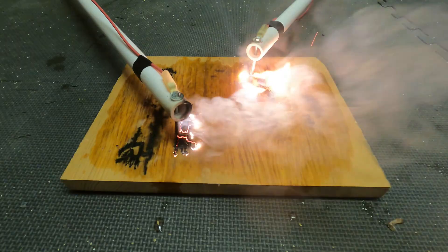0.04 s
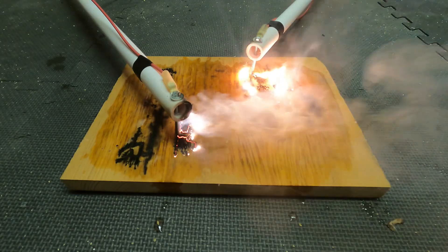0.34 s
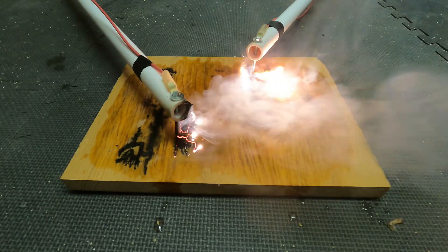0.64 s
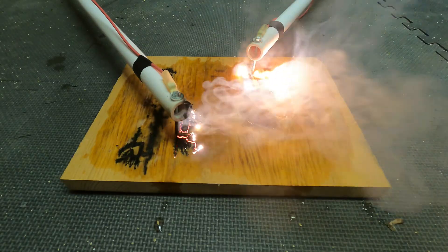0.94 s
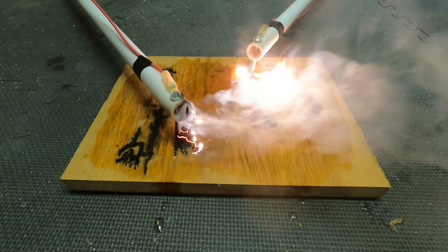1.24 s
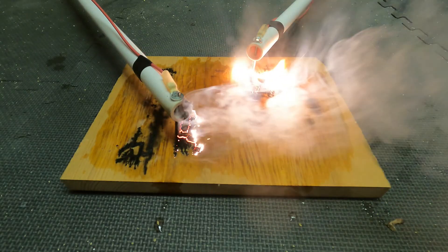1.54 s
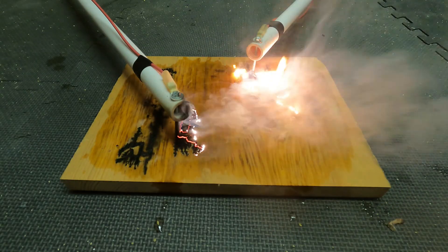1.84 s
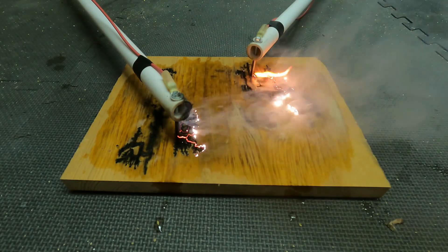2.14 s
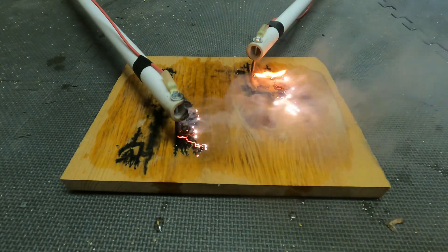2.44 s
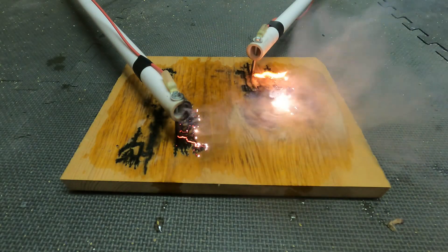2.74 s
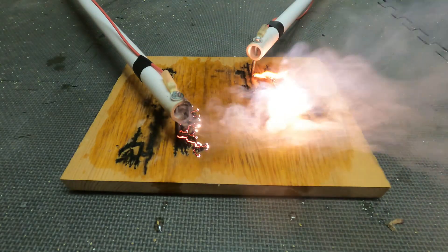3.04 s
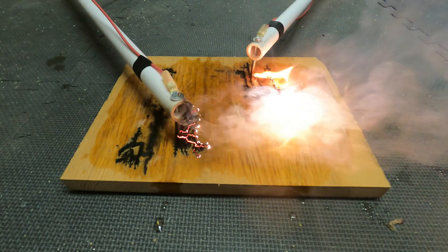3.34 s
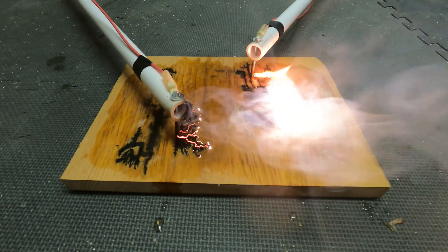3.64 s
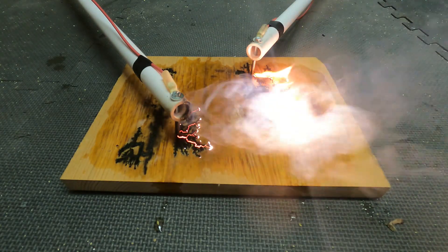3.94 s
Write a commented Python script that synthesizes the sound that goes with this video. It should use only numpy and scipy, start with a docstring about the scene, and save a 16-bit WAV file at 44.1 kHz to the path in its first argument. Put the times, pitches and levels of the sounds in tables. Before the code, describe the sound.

An electric arc crackles and sizzles through wet wood over a low hum.

```python
"""Arc burning through wet wood

Close by in a workshop, just right of the stereo microphones, high voltage from a mains transformer
burns a track through a wet board. The arc strikes every half cycle as a short volley of tiny sparks,
much stronger in one polarity, and ticks as it goes out. It flares and the wood pops; for most of the
third second it sinks to a soft sizzle. The transformer hums throughout."""
import sys
import numpy as np
from scipy import signal
from scipy.fft import rfft, irfft
from scipy.io import wavfile

SR = 44100
rng = np.random.default_rng(int(sys.argv[2]) if len(sys.argv) > 2 else 0)


def generate_wav(sig):
    """Save sig (samples, or channels by samples) to the path in sys.argv[1] as 16-bit PCM at SR."""
    pcm = np.round(np.clip(np.atleast_2d(sig).T, -1, 1) * 32767).astype(np.int16)
    wavfile.write(sys.argv[1], SR, pcm)


N = 176400
TIME = np.arange(N) / SR
MAINS_HZ = 59.984
# moments in the mains cycle: strong volley, weak volley, arc going out, trough of the hum
STRONG_AT_S, WEAK_AT_S, OUT_AT_S, TROUGH_AT_S = .0146, .0057, .0092, .0017
MAINS_PHASE = 2 * np.pi * MAINS_HZ * (TIME - TROUGH_AT_S)
STRONG_DB, WEAK_DB, SIZZLE_DB, FLARE_DB = -1, -.3, -18, -1.26
POP_DB, TICK_DB, FLOOR_DB = 2.5, -18.5, -42
CLICK_GAIN = np.sqrt(.004 * SR)  # gives one sample the energy of 4 ms at the same level


# Volleys of the strong and of the weak polarity: (time [s], relative level [dB])
STRONG_VOLLEYS = [(0, -27.5), (.09, -32), (.15, -37), (.21, -27), (.53, -26), (.565, -30), (.7, -32),
                  (.8, -29.5), (.885, -26), (.92, -36), (1.13, -33), (1.19, -24), (1.232, -25.5),
                  (1.248, -37), (1.3, -43), (1.33, -25), (1.42, -29.5), (1.45, -33.5), (1.5, -29.5),
                  (1.516, -23), (1.58, -24), (1.67, -26), (1.7, -37), (1.785, -33.5), (1.83, -28),
                  (1.865, -32), (1.94, -27.5), (1.99, -32), (2.06, -41), (2.6, -40.5), (2.82, -43.5),
                  (2.848, -32), (2.9, -32.5), (2.915, -43), (2.94, -27.5), (3.06, -26.5), (3.1, -24.5),
                  (3.15, -26.5), (3.27, -25), (3.31, -32.5), (3.35, -23.5), (3.565, -22), (3.6, -28),
                  (3.65, -33), (3.68, -28.5), (3.98, -27)]
WEAK_VOLLEYS = [(0.01, -32.5), (0.3, -32), (0.85, -32.5), (1.1, -33.5), (1.18, -31.5), (1.65, -31.5),
                (1.95, -34), (2.08, -41.5), (2.18, -39), (2.32, -38), (2.45, -42), (2.82, -43.5),
                (2.84, -37), (2.9, -44), (2.92, -36), (2.94, -36), (3.18, -37.5), (3.35, -40), (3.98, -43)]
# The arc's midrange spit and top fizz: (time [s], boost [dB])
SPIT_BOOST = [(0, 3), (.5, -0.5), (1.05, -1.5), (1.2, 0.5), (1.45, 3), (1.9, 2), (2.15, -4.5), (2.8, -3),
              (3.2, -2.5), (3.5, -2), (4, 1)]
FIZZ_BOOST = [(0, 7), (.25, 7), (.6, 1), (1.1, 3.5), (1.15, 2.5), (1.35, -2), (1.58, 4), (1.65, -5),
              (1.8, 1), (1.95, -1.5), (2.8, 1), (3.02, 0), (3.3, 0), (3.47, -3.5), (3.8, 4.5), (4, -.5)]
# Tone of the sparks at the microphones: (frequency [Hz], relative level [dB])
SPARK_SPECTRUM = [(60, -35), (200, 0.5), (400, -1), (600, -1), (800, -7), (1050, -1.5), (1600, -3.5),
                  (2100, -1.5), (3000, -2), (4000, .5), (5500, 0), (7000, -1), (8300, -11.5), (9600, -9),
                  (11500, -11.5), (13000, -17), (14000, -23.5), (16000, -50)]
def arc():
    """Sparks of both polarities and the sizzle of the boiling wet wood between them."""
    strong = polarity(STRONG_VOLLEYS, STRONG_AT_S, flicker_db=0, wander_s=.00015, stretch=1, uneven_db=5)
    weak = polarity(WEAK_VOLLEYS, WEAK_AT_S, flicker_db=3.2, wander_s=.0002, stretch=1.15, uneven_db=10)
    spiky_noise = rng.standard_normal(N) * rng.exponential(1, N)
    sizzle = from_db(at(WEAK_VOLLEYS, TIME) + SIZZLE_DB) * spiky_noise
    sparks = workshop(from_db(STRONG_DB) * strong + from_db(WEAK_DB) * weak + sizzle)
    sparks = shifting_path(sparks, at(SPIT_BOOST, TIME), at(FIZZ_BOOST, TIME), patchy_db=1.5)
    return coloured(sparks, SPARK_SPECTRUM)


# Scatter of a volley's sparks, tighter and raspier after the lull: (time [s], base spread [s])
SPARK_SPREAD = [(0, 0.00092), (2.8, 0.00093), (3.35, .00065), (4, 0.00064)]
def polarity(levels, offset_s, flicker_db, wander_s, stretch, uneven_db):
    """The arc strikes once a cycle in this polarity, each time a little early or late."""
    times = every_cycle(offset_s)
    wander, flicker = rng.standard_normal((len(times), 2)).T
    db = at(levels, times) + flicker_db * flicker
    return volleys(times + wander_s * wander, db, stretch * at(SPARK_SPREAD, times), uneven_db, count=40)


def volleys(times, db, spread_s, uneven_db, count):
    """At each time, a cluster of spark clicks of uneven size and random sign, sharing one total level."""
    scatter = np.sqrt(6) * rng.triangular(-1, 0, 1, (len(times), count))  # standard deviation 1
    when = times[:, None] + spread_s[:, None] * scatter
    size = from_db(uneven_db * np.minimum(rng.standard_normal(when.shape), 2))
    size *= rng.choice([-1, 1], when.shape)
    size *= (from_db(db) * CLICK_GAIN / np.linalg.norm(size, axis=1))[:, None]
    inside = (when >= 0) & (when < N / SR)
    return np.bincount((when[inside] * SR).astype(int), size[inside], N)[:N]


# How far each band follows the spit and the fizz: (frequency [Hz], share [0-1])
SPIT_BANDS = [(500, 0.5), (1100, 0.97), (1800, 0.97), (3600, 0)]
FIZZ_BANDS = [(6000, 0.012), (8500, 0.55)]
def shifting_path(sparks, spit_db, fizz_db, patchy_db):
    """The spark path keeps changing, and with it the midrange, the top and each half-octave band."""
    octaves = np.log2(np.maximum(np.arange(N // 2 + 1) * SR / N, 1))
    centres = np.arange(9, 14.1, .5)  # octaves above 1 Hz
    spectrum, shifted = rfft(sparks), 0
    for hz, selector in zip(2 ** centres, np.eye(len(centres))):
        band = irfft(spectrum * np.interp(octaves, centres, selector), N)
        db = spit_db * at(SPIT_BANDS, hz) + fizz_db * at(FIZZ_BANDS, hz) + patchy_db * drift(rate_hz=35)
        shifted += band * from_db(db)
    return shifted


# Flares: (time [s], relative level [dB], spark spread [s], midrange spit [dB], top fizz [dB])
FLARE_CRACKS = [(0.0652, -15.5, .0008, -6, -8), (.0816, -24.5, 0.001, 0, -2),
                (.1312, -28.5, 0.00064, 2, -1), (0.198, -26, 0.00037, -3, -2),
                (0.2314, -27, 0.00073, -7, 3), (0.3643, -25.5, 0.00045, -5, -5),
                (.381, -24, 0.0011, -8, -12), (0.4474, -21.5, .0007, -6, -10), (.5148, -23, 0.001, -6, -5),
                (0.5484, -22.5, 0.00055, -13, -4), (0.7821, -26.5, 0.00049, -2, -3),
                (0.8154, -21.5, 0.00082, -3, 0), (.865, -24.5, 0.00065, 0, -6),
                (.8989, -25.5, 0.00044, -7, -6), (0.9818, -22.5, 0.00045, 0, -4),
                (1.0159, -22.5, 0.00072, 0, -1), (1.0813, -25, 0.0011, -15, 1),
                (1.1488, -29, 0.0011, 0, 11), (1.198, -30, 0.00031, 3, -6), (1.2823, -22.5, 0.00063, 4, 1),
                (1.315, -22.5, 0.00064, 2, 0), (1.5486, -23.5, .001, -5, -4),
                (1.5982, -19.5, 0.00073, -5, -9), (1.6143, -25, 0.001, 7, -14),
                (1.6312, -22.5, 0.00087, 0, -14), (1.6651, -19.5, 0.00068, -3, -17),
                (1.6826, -19, 0.00066, -3.5, -13), (1.7992, -20, 0.00057, 1, -5),
                (1.8159, -22.5, 0.00069, 0, -1), (1.8495, -22.5, 0.00075, 2.5, -7),
                (2.0152, -33, 0.00066, 5, -6), (2.8316, -31, 0.00022, 2, -18), (2.8657, -36, 0.0005, 4, 0),
                (2.9652, -27.5, 0.0011, -2.5, 0), (3.015, -21.5, 0.00079, -5, 4),
                (3.0303, -25, 0.00041, -10, 2), (3.0986, -27.5, 0.00095, 5, 6),
                (3.1322, -18.5, 0.00044, -12, -5), (3.232, -22, .0009, -7, -11),
                (3.2481, -21.5, 0.0005, -18, -5), (3.3807, -26.5, 0.00058, 3, 0),
                (3.3973, -25, 0.00044, -1, 2), (3.4317, -28, 0.00046, -10, -7),
                (3.5494, -28, 0.00046, 6, -6), (3.665, -26, 0.0011, -2, 3), (3.8145, -24.5, .0006, 0, -1)]
def flares():
    """The arc flares into loud cracks with little body, each with its own length and colour."""
    times, db, spread_s, spit_db, fizz_db = np.transpose(FLARE_CRACKS)
    sparks = workshop(volleys(times, db + FLARE_DB, spread_s, uneven_db=4.5, count=30))
    sparks = shifting_path(sparks, held(times, spit_db), held(times, fizz_db), patchy_db=2.06)
    return cut(coloured(sparks, SPARK_SPECTRUM), 640, "high", order=2)


# Pops in the board: (time [s], relative level [dB], added snap [dB], added knock [dB])
STEAM_BURSTS = [(0.9439, -36.5, -5, -3), (1.2783, -40, -8, 3), (1.413, -40, -12, 2), (1.857, -32, 4, -10),
                (1.967, -34.5, -2, -7), (2.0568, -38.5, 9, -14), (2.3079, -33, -4, -5.5),
                (2.6902, -42, 4, 5.5), (2.8894, -36.5, -3, 0.5), (3.4759, -29.5, -12, -4)]
# Tone of the pop, its snap and its knock: (frequency [Hz], relative level [dB])
POP_SPECTRUM = [(100, 2), (500, 7), (1200, 8.5), (2200, 4.5), (3200, -0.5), (6500, -19), (16000, -35)]
SNAP_SPECTRUM = [(500, -27), (1500, -6), (3000, -4), (5000, -2.5), (6500, -13), (9000, -17), (16000, -37)]
KNOCK_SPECTRUM = [(40, -24), (130, 9), (400, 7), (700, -3), (1200, 14), (2500, -41), (16000, -83)]
def steam_pops():
    """Steam pockets burst in the wood, each with its own share of bright snap and of the board's knock."""
    times, db, snap_db, knock_db = np.transpose(STEAM_BURSTS)
    bursts = workshop(np.bincount((times * SR).astype(int), from_db(db + POP_DB) * CLICK_GAIN, N))
    snap = coloured(bursts * from_db(held(times, snap_db)), SNAP_SPECTRUM)
    knock = coloured(bursts * from_db(held(times, knock_db)), KNOCK_SPECTRUM)
    return coloured(bursts, POP_SPECTRUM) + snap + knock


# Tone of the dying arc's tick: (frequency [Hz], relative level [dB])
TICK_SPECTRUM = [(100, -8), (350, -4), (600, -1.5), (800, -9), (1150, -7.5), (2000, -12.5), (4000, -23),
                 (16000, -78)]
def ticks(wander_s, flicker_db, throb_share):
    """A dull tick once a cycle as the arc goes out, louder when the flame throbs."""
    times = every_cycle(OUT_AT_S)
    wander, flicker = rng.standard_normal((len(times), 2)).T
    db = TICK_DB + throb_share * at(FLAME_LEVEL, times) + flicker_db * flicker
    samples = np.clip((times + wander_s * wander) * SR, 0, N - 1).astype(int)
    return coloured(workshop(np.bincount(samples, from_db(db) * CLICK_GAIN, N)), TICK_SPECTRUM)


# Fundamental of the flame's throb: (time [s], level [dB])
FLAME_LEVEL = [(0, -45.5), (.9, -43.5), (1.2, -37.5), (1.37, -46), (1.6, -49), (1.88, -38), (2.1, -91),
               (2.8, -58), (3.05, -39.5), (3.45, -37), (3.7, -43.5), (3.85, -39), (4, -39)]
def flame_throb():
    """The flame, pumped once a cycle, gives a low throb that wavers in phase."""
    fundamental = np.sin(MAINS_PHASE + drift(rate_hz=7.8))
    third = from_db(-4) * np.sin(3 * MAINS_PHASE + drift(rate_hz=13.6))
    return np.sqrt(2) * from_db(at(FLAME_LEVEL, TIME)) * (fundamental + third)


# Hum under the changing load, centred between the microphones: (time [s], relative level [dB])
LOAD_LEVEL = [(0.0, -29), (0.03, -26), (0.51, -25.5), (0.93, -28), (0.97, -27), (1.25, -29), (1.61, -26.5),
              (1.7, -29), (1.79, -27.5), (1.99, -32), (2.57, -33.5), (3.17, -27.5), (3.59, -28.5),
              (3.7, -30), (3.97, -28), (4.0, -27)]
# Partials of that hum and of the steady buzz: (harmonic [x mains], relative level [dB])
LOAD_HARMONICS = [(2, 1.5), (4, -16.5), (6, -24)]
BUZZ_HARMONICS = [(3, -64), (4, -46), (5, -58), (6, -57), (7, -60.5), (8, -91), (9, -62), (10, -58.5),
                  (11, -62), (12, -60.5), (16, -57), (17, -57), (21, -64), (22, -62.5), (23, -58.5)]
def transformer(waver_db, buzz_waver):
    """A cusped hum at twice the mains rate follows the load, over a buzz whose partials waver."""
    load = from_db(at(LOAD_LEVEL, TIME) + waver_db * drift(rate_hz=19.5))
    hum = load * sum(from_db(db) * np.cos(k * MAINS_PHASE) for k, db in LOAD_HARMONICS)
    buzz = 0
    for k, db in BUZZ_HARMONICS:
        waver = buzz_waver * drift(rate_hz=1.64) * np.sin(k * MAINS_PHASE)
        buzz += from_db(db) * (np.cos(k * MAINS_PHASE) + waver)
    return -np.sqrt(2) * (hum + buzz)


# The workshop's background: (frequency [Hz], relative level [dB])
ROOM_TONE_SPECTRUM = [(20, -20), (31, 2), (39, 8), (49, -11), (80, 0), (130, -6), (200, -6), (300, -13.5),
                      (450, -15.5), (800, -20), (1050, -14), (1700, -23.5), (4000, -30), (8000, -30),
                      (16000, -46)]
def room_tone(side_db):
    """Low rush of the workshop, nearly alike at both microphones."""
    mid, side = (coloured(rng.standard_normal(N), ROOM_TONE_SPECTRUM) for _ in range(2))
    side = from_db(side_db) * cut(side, 590, "high", order=1)
    return from_db(FLOOR_DB) * (mid + side * [[1], [-1]])


def workshop(clicks, room_db=-9, scatter_db=-8, pan_db=.79, left_lag_s=.00001):
    """Clicks reach the microphones from slightly right, with a short room tail that is mono in the bass."""
    tail, side = (from_db(room_db) * diffuse(clicks, t60_s=.16, gap_s=.0003) for _ in range(2))
    # the very top scatters differently to each side
    scatter = cut(diffuse(clicks, t60_s=.0005, gap_s=0), 7700, "high", order=2)
    side = cut(side, 795, "high", order=1) + from_db(scatter_db) * scatter
    left, right = clicks + tail + side * [[1], [-1]]
    lag = np.exp(-2j * np.pi * np.arange(N // 2 + 1) * SR / N * left_lag_s)
    return np.array([irfft(rfft(left) * lag, N), right]) * from_db([[-pan_db], [pan_db]])


def diffuse(x, t60_s, gap_s):
    """Noise that takes over the energy of x after a gap and dies away."""
    t = TIME[:SR // 2]
    decay = from_db(-60 * t / t60_s) ** 2 * (t >= gap_s)
    power = signal.fftconvolve(x ** 2, decay / decay.sum())[:N]
    return np.sqrt(np.maximum(power, 0)) * rng.standard_normal(N)


def coloured(x, spectrum, size=4096):
    """Causal (minimum-phase) filter of unit energy, shaped like the spectrum."""
    hz, db = np.transpose(spectrum)
    grid_hz = np.maximum(np.arange(size // 2 + 1) * SR / size, 1)
    gain = from_db(np.interp(np.log(grid_hz), np.log(hz), db))
    cepstrum = irfft(np.log(gain))
    cepstrum[1:size // 2] *= 2
    cepstrum[size // 2 + 1:] = 0
    response = irfft(np.exp(rfft(cepstrum)))
    response /= np.linalg.norm(response)
    return signal.oaconvolve(np.atleast_2d(x), response[None], axes=1)[:, :N]


def cut(x, hz, kind, order):
    """Butterworth high- or low-pass."""
    return signal.sosfilt(signal.butter(order, hz, kind, fs=SR, output="sos"), x + 1e-18)


def drift(rate_hz, knot_hz=200):
    """Smooth random wander with standard deviation 1."""
    knots = rng.standard_normal(int(N / SR * knot_hz) + 400)
    pole = np.exp(-2 * np.pi * rate_hz / knot_hz)
    slow = signal.lfilter([1], [1, -2 * pole, pole * pole], knots)[398:]  # once the filter has settled
    return np.interp(TIME * knot_hz, np.arange(len(slow)), slow / slow.std())


def every_cycle(offset_s):
    """One moment in every mains cycle."""
    return np.arange(offset_s, N / SR, 1 / MAINS_HZ)


def held(times, values, lead_s=.004):
    """Each event's value, kept from just before it until the next takes over."""
    return values[np.maximum(np.searchsorted(times - lead_s, TIME) - 1, 0)]


def at(curve, points):
    """Value of a curve at the given times or frequencies."""
    return np.interp(points, *np.transpose(curve))


def from_db(db):
    """Decibels to gain."""
    return 10 ** (np.asarray(db) / 20)


def scene():
    """The burning board in front, over the transformer and the room tone."""
    board = arc() + flares() + ticks(wander_s=.00017, flicker_db=2.5, throb_share=.49) + steam_pops()
    return board + transformer(waver_db=1, buzz_waver=.38) + flame_throb() + room_tone(side_db=-4)


def record(dry):
    """The recorder cuts the deepest bass, rounds the highest peaks and cuts the very top."""
    peak_limit, cutoff_hz = .5, 15900
    rounded = peak_limit * np.tanh(cut(dry, 34, "high", order=1) / peak_limit)
    return signal.sosfilt(signal.ellip(10, .2, 80, cutoff_hz, fs=SR, output="sos"), rounded)


dry = scene()
out = record(dry)
generate_wav(out)
```